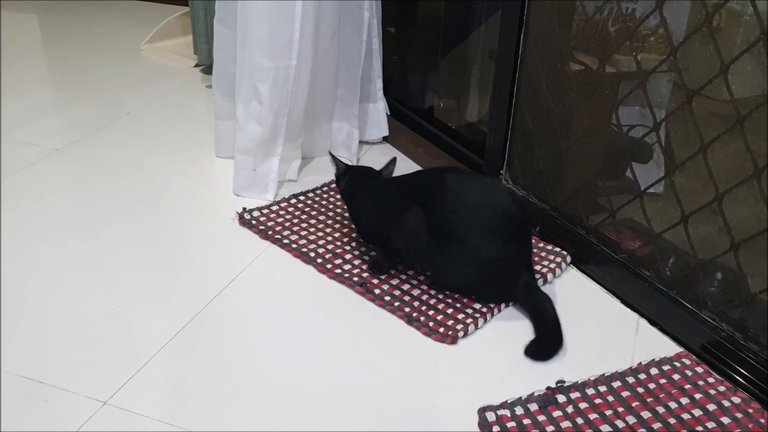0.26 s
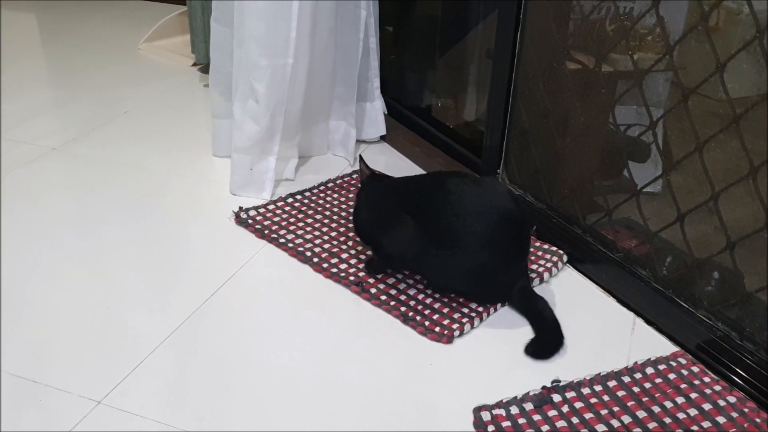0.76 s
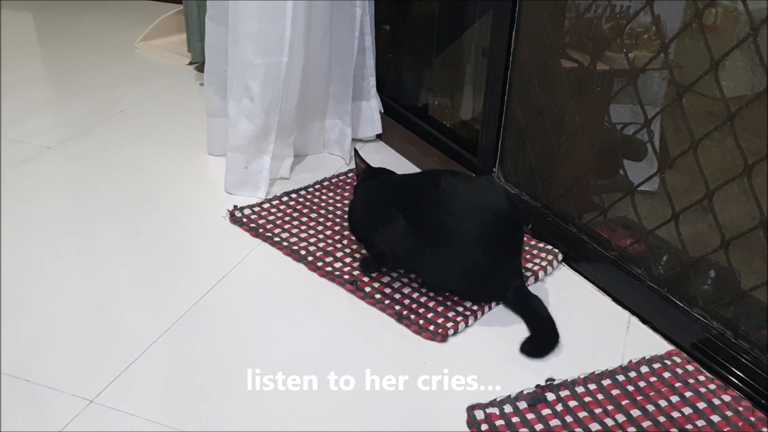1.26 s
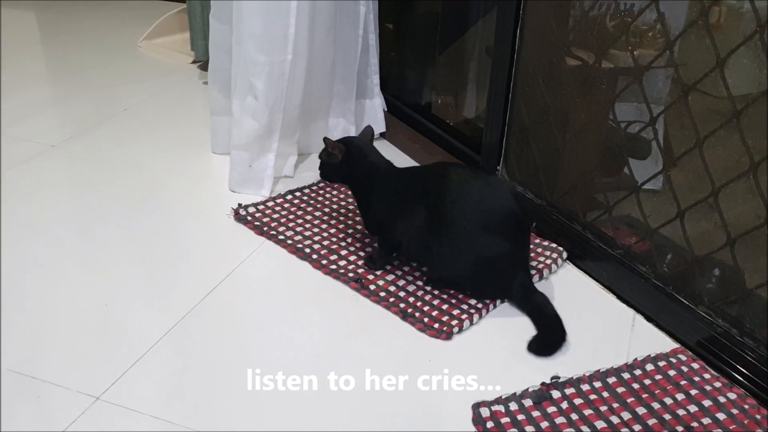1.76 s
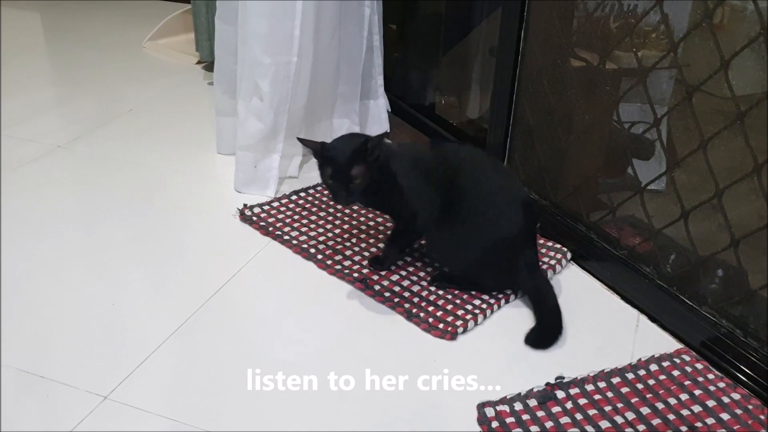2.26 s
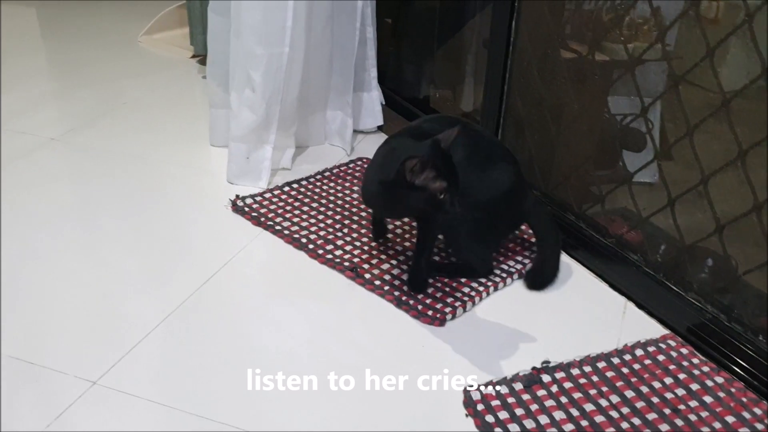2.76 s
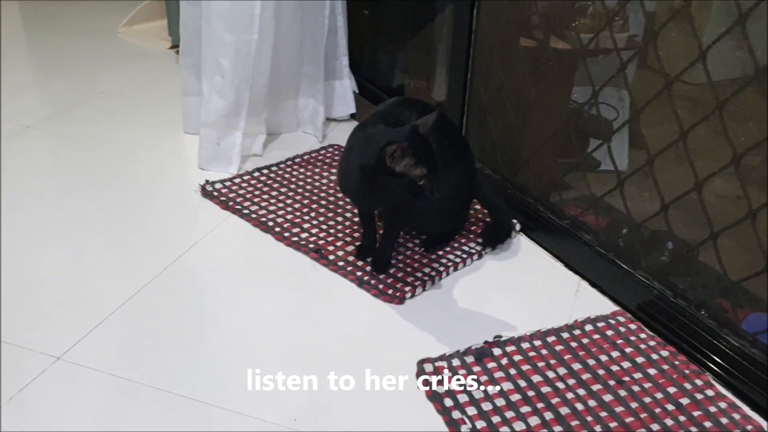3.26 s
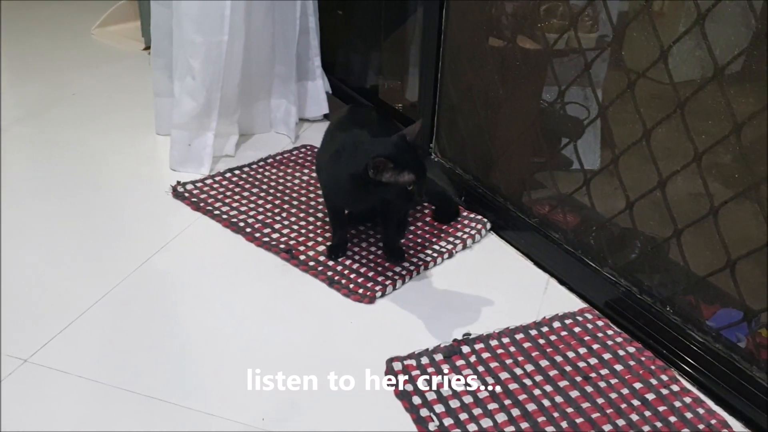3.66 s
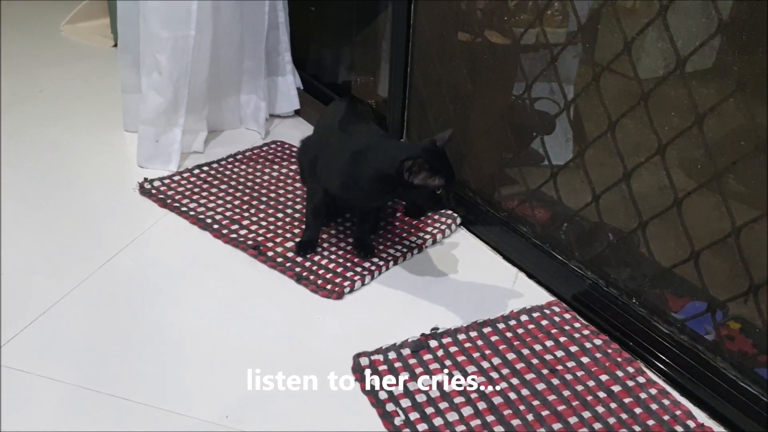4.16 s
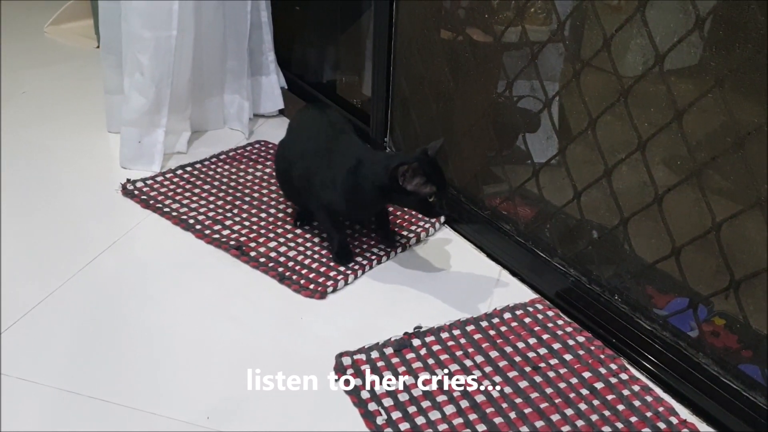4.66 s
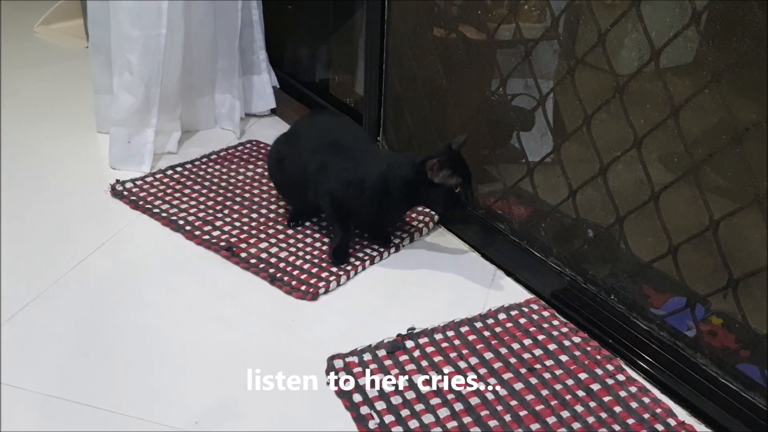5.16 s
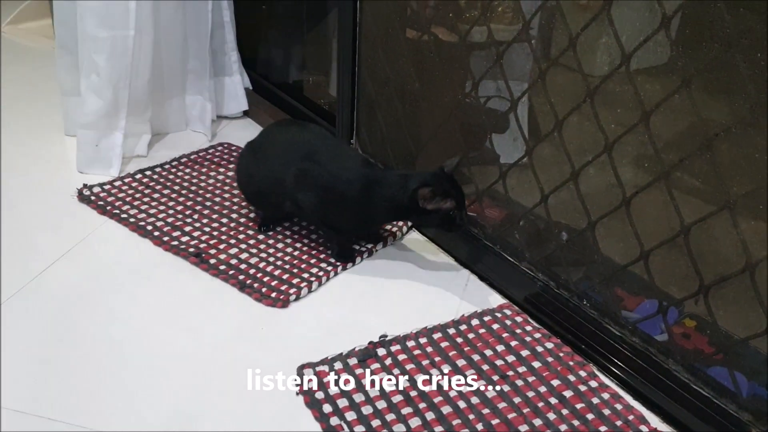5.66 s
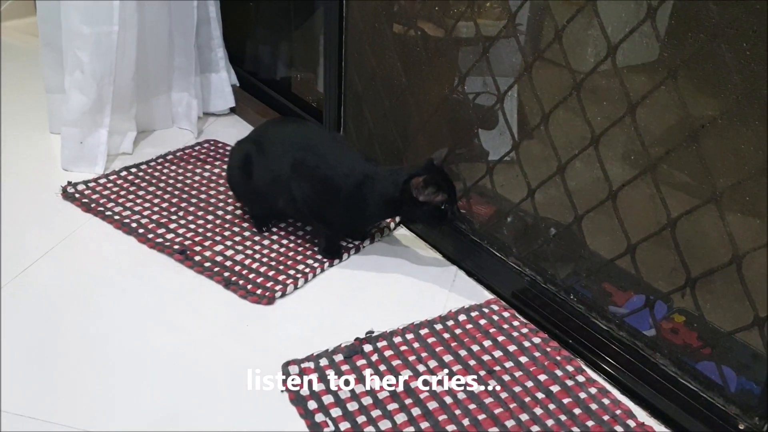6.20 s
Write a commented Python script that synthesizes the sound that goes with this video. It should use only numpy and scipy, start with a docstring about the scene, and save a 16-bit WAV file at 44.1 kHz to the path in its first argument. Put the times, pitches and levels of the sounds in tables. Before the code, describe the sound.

Indoors, a cat moans quietly twice, then cries out loudly twice, each call ringing briefly off hard tiles above faint room hum and hiss.

```python
"""In a tiled room with a glass door, a cat on a mat moans twice, muffled, then gives two loud, open cries.
It sniffs around the calls and something ticks once before the last one, which comes from the door.
The calls are harmonics of the vocal folds shaped by moving resonances and roughened by strain.
Sniffs and tick are coloured noise; decaying noise makes the room's ring.
A motor drones far off in steady room air, and the microphone hisses."""
import sys
import numpy as np
from scipy import signal
from scipy.fft import rfft, irfft, next_fast_len
from scipy.io import wavfile
from scipy.ndimage import map_coordinates

SR = 44100
rng = np.random.default_rng(int(sys.argv[2]) if len(sys.argv) > 2 else 0)


def file_out(sig):
    """Save sig as 16-bit WAV at sys.argv[1]."""
    # one column per channel
    cols = np.atleast_2d(sig).T
    # limit, then scale
    lim = np.clip(cols, -1, 1)
    pcm = np.round(lim * 32767).astype(np.int16)
    wavfile.write(sys.argv[1], SR, pcm)


N = 283563  # length [samples]


def amp(db):
    """Decibels to gain."""
    return 10 ** (np.asarray(db) / 20)


def unit(x):
    """Scale to rms 1."""
    return x / np.sqrt(np.mean(x ** 2) + 1e-20)


def along(points, hz):
    """(frequency [Hz], value) points read on a log frequency axis."""
    f, v = np.transpose(points)
    return np.interp(np.log(hz + 1), np.log(f + 1), v)


def curves(rows, t):
    """Each column after the time, read at the times t."""
    s, *columns = np.transpose(rows)
    return [np.interp(t, s, column) for column in columns]


def wobble(rate, size):
    """A smooth random curve with rate knots a second."""
    knots = rng.standard_normal(8192)
    return map_coordinates(knots, [np.arange(size) * rate / SR], mode="wrap")


def filtered(x, response):
    """x shaped by a response of frequency."""
    size = x.shape[-1]
    padded = next_fast_len(size + 8192)
    spectrum = rfft(x, padded) * response(np.fft.rfftfreq(padded, 1 / SR))
    return irfft(spectrum, padded)[..., :size]


def noise(colour, size):
    """Noise of rms 1 with a (frequency [Hz], level [dB]) colour."""
    return unit(filtered(rng.standard_normal(size), lambda hz: amp(along(colour, hz))))


def pan(left_db):
    """Gains of the two channels, left_db apart."""
    return amp(np.array([[left_db], [-left_db]]) / 2)


def resonance(hz, centre_hz, width_hz):
    """A peak of height 1, falling to half at width_hz from its centre."""
    return 1 / (1 + ((hz - centre_hz) / width_hz) ** 2)


# Spectrum of the room air: (frequency [Hz], relative density [dB per Hz])
AIR_COLOUR = [(20, -6), (40, -10.5), (75, 5), (130, 3.5), (165, -6), (350, -11), (550, -19.5), (800, -24),
              (1200, -28), (3000, -33.5), (6800, -35), (8000, -41.5), (11000, -33), (15500, -33)]
# How alike the air is at the two microphones: (frequency [Hz], likeness [0-1])
AIR_LIKENESS = [(50, 0.8), (300, 0.83), (900, 0.37), (2500, 0.6), (8000, 0.017)]
# Lean of the air to the left: (frequency [Hz], left minus right [dB])
AIR_LEAN = [(50, 2), (300, 8), (1000, 8), (2500, -2), (8000, 1)]


def background(level_db=-62):
    """Room air all round: shared noise makes the bass alike in both channels, the treble unrelated."""
    shared, opposed = noise(AIR_COLOUR, N), noise(AIR_COLOUR, N)

    def angle(hz):
        return np.arccos(np.clip(along(AIR_LIKENESS, hz), -1, 1)) / 2

    def lean(hz):
        return amp(np.outer([.5, -.5], along(AIR_LEAN, hz)))

    mid = filtered(shared, lambda hz: np.cos(angle(hz)))
    side = filtered(opposed, lambda hz: np.sin(angle(hz)))
    return amp(level_db) * filtered(np.array([mid + side, mid - side]), lean)


def microphone_hiss(level_db=-75.5, centre_hz=9530, half_width_hz=520):
    """A thin, steady band of electronic hiss, stronger on the right."""
    def band(hz):
        return 1 / (1 + np.abs((hz - centre_hz) / half_width_hz) ** 10)

    hiss = unit(filtered(rng.standard_normal((2, N)), band))
    return amp(level_db) * hiss * pan(left_db=-6.5)


# Tones of the far motor, before waver and pan: (frequency [Hz], rms level [dB])
MOTOR_TONES = [(56.5, -49.5), (59.2, -86), (112.6, -78.5), (121.5, -66)]
# Narrow band of rushing air, before pan: (centre [Hz], width [Hz], rms level [dB])
DUCT_AIR = [(816.4, 73, -81.5)]


def motor(drift=0.69, waver_db=1.95):
    """A distant motor: nearly steady, slightly wavering low tones, and a narrow band of moving air."""
    t = np.arange(N) / SR
    out = np.zeros(N)
    lowest_hz = MOTOR_TONES[0][0]
    for hz, db in MOTOR_TONES:
        level = amp(db + waver_db * wobble(12, N))
        phase = 2 * np.pi * hz * t + drift * hz / lowest_hz * wobble(3.9, N)
        out += np.sqrt(2) * level * np.sin(phase)
    for hz, width, db in DUCT_AIR:
        rush = filtered(rng.standard_normal(N), lambda f: resonance(f, hz, width / 2))
        out += amp(db) * unit(rush)
    return out * pan(left_db=4.5)


# How long the tiles ring: (frequency [Hz], time to fall 60 dB [s])
ROOM_DECAY = [(200, 0.22), (500, 0.41), (1000, 0.42), (2200, 0.44), (5000, 0.44), (12000, .25)]


def room(x, wet_db=-7, delay=0.016):
    """Tiles and glass answer each microphone with a different dying tail, faster or slower by pitch."""
    hz, t, grains = signal.stft(rng.standard_normal((2, SR)), SR, nperseg=256)
    decay = amp(-60 * t / along(ROOM_DECAY, hz)[:, None])
    tail = signal.istft(grains * decay, SR, nperseg=256)[1]
    # Silent for one delay [s], then fading in over another.
    tail *= np.clip(np.arange(tail.shape[1]) / SR / delay - 1, 0, 1)
    # Unit gain in the band of the voice, 400-3000 Hz.
    strength = np.sqrt(np.mean(np.abs(rfft(tail, SR)[:, 400:3000]) ** 2))
    return amp(wet_db) * signal.fftconvolve(x[None], tail / strength, axes=1)[:, :N]


# Where the head points, between the two microphones:
# (frequency [Hz], left minus right [dB], phase by which the left leads [rad])
FROM_MAT = [(493, 4, -5.5), (1050, 3.5, 3.16), (2130, 6, 1.15), (5960, 4.5, 1.87), (11000, -13, 1)]
FROM_TURN = [(550, 3.5, 1), (1110, 2.5, .5), (1720, 0.5, 1.76), (2240, 6, 2), (4500, 6.5, 1.5),
             (11000, -10, 1.1)]
FROM_DOOR = [(500, 7.5, 0.46), (1000, 4.5, 0.6), (1930, 3, 2.2), (4300, 6, -2.6), (11000, 1, 1.7)]


def heard_from(x, place):
    """Direct sound: each microphone takes half of the difference in level and phase."""
    hz, lean_db, lead = np.transpose(place)
    sides = np.array([[.5], [-.5]])

    def response(f):
        level = amp(sides * along(np.c_[hz, lean_db], f))
        return level * np.exp(1j * sides * along(np.c_[hz, lead], f))

    return filtered(x, response)


# A claw-like tick: (time [s], level before the gain [dB])
TICK_TIMES = [(4.5518, -48.5)]
# Its spectrum: (frequency [Hz], relative level [dB])
TICK_SPECTRUM = [(1500, 6.5), (3200, -4), (4500, -3.5), (7000, 4), (9500, 3), (11500, -13), (15000, -21.5)]


def tick(gain_db=-10, t60=0.082):
    """A small dry tick, like a claw on the door track: noise that starts at once and dies away."""
    t = np.arange(N) / SR
    decay = sum((t >= s) * amp(db + gain_db - 60 * np.abs(t - s) / t60) for s, db in TICK_TIMES)
    return decay * noise(TICK_SPECTRUM, N)


# Quick sniffs of the cat: (time of the middle [s], level there [dB], half length [s])
SNIFF_TIMES = [(0.378, -66.5, 0.029), (1.391, -72, 0.04), (3.351, -72, 0.037), (6.363, -68, 0.035)]
# Their spectrum: (frequency [Hz], relative level [dB])
SNIFF_SPECTRUM = [(500, -20), (1000, -3), (1500, -0.5), (2200, -12), (3500, -21.5), (6000, -21),
                  (9000, -28), (15000, -24)]


def sniffs():
    """Short swells of air noise through the cat's nose."""
    t = np.arange(N) / SR
    swell = sum(amp(db) * np.exp(-.5 * ((t - s) / half) ** 2) for s, db, half in SNIFF_TIMES)
    return swell * noise(SNIFF_SPECTRUM, N)


# Strain of each yowl: (hoarse onset [s], roughness then [0-1], roughness when clear [0-1],
# cracked end [s], roughness then [0-1])
CALL_STRAIN = [(.31, .62, .2, .04, .45), (.1, .4, .2, .05, .65), (.25, .26, .13, .03, .55),
               (.19, .62, .095, .07, .65)]


def strain(t, start, end, call, clear_s=.02, crack_s=.015):
    """Roughness 0-1 through a call: hoarse onset, clear middle, cracked end."""
    hoarse_for, hoarse, clear, cracked_for, cracked = CALL_STRAIN[call]
    onset = .5 - .5 * np.tanh((t - start - hoarse_for) / clear_s / 2)
    ending = .5 + .5 * np.tanh((t - end + cracked_for) / crack_s / 2)
    return np.clip(clear + (hoarse - clear) * onset + (cracked - clear) * ending, 0, 1)


def vocal_phase(t, pitch, rough, tremor=.028, jitter=.028):
    """Phase of the vocal folds: strain makes them quaver and slip from cycle to cycle."""
    unsteady = tremor * wobble(55, len(t)) + jitter * wobble(420, len(t))
    return 2 * np.pi * np.cumsum(pitch * (1 + rough * unsteady)) / SR


def overtones(phase, orders, weights):
    """Weighted harmonics of the phase, together of rms 1."""
    return np.sqrt(2) * np.sum(weights * np.sin(orders * phase), 0) / np.linalg.norm(weights, axis=0)


# Pushes of effort that brighten the voice, before the gain of the call:
# (time [s], treble peak [dB], rise [dB/s], fall [dB/s])
EFFORT_PUSHES = [(.74, -73, 250, 90), (1.0, -72, 193, 84), (2.33, -69.5, 600, 43), (2.41, -69, 213, 87),
                 (3.7, -72, 151, 8), (3.95, -53.5, 222.5, 34.5), (4.08, -53.5, 144, 80),
                 (4.351, -61.5, 302, 197), (5.59, -55.5, 167.5, 37.5), (5.82, -45.5, 64.5, 92)]


def treble_db(t):
    """Level of the high harmonics: it climbs to each push within the call and sinks after it."""
    slopes = [db - np.maximum(rise * (s - t), fall * (t - s))
              for s, db, rise, fall in EFFORT_PUSHES if t[0] < s < t[-1]]
    return np.max(slopes, 0)


# Swing of the tongue's sharp upper resonance in each yowl:
# (time of the turn [s], half length [s], resting centre [Hz], centre at the turn [Hz], boost then [dB])
TONGUE_SWINGS = [(.9, .2, 6600, 6640, 10), (2.45, .2, 5700, 5600, 12), (3.821, 0.21, 6270, 6775, 9.5),
                 (5.66, 0.18, 5234, 4040, 31.5)]


def tongue(t, call, rest_db=5):
    """Centre and boost of the upper resonance: one smooth swing out and back."""
    turn_s, half_s, rest_hz, turn_hz, boost_db = TONGUE_SWINGS[call]
    swing = np.exp(-.5 * ((t - turn_s) / half_s) ** 2)
    return rest_hz + (turn_hz - rest_hz) * swing, rest_db + (boost_db - rest_db) * swing


# What full roughness does to each yowl: (growl relative to the fundamental [dB],
# flutter depth [ratio], rasp depth [ratio], shimmer depth [ratio])
CALL_GRAIN = [(-20, .33, .25, .6), (-22, .26, .27, .55), (-9, .25, .09, .7), (-4, .32, .13, .6)]
# Share of air in the treble of each yowl at its clearest, at air_hz: [0-1]
CALL_BREATH = [1, .5, .11, .035]


def yowl(call, vowel, melody, edge_colour, gain_db, width_hz, flutter_hz=125, beam_db=4.5, fade=0.037,
         air_hz=3800, air_per_rough=1.1):
    """One call: the harmonics of the folds pass two moving resonances and roughen with strain."""
    start, end = vowel[0][0], vowel[-1][0]
    span = np.arange(int((start - .05) * SR), int((end + .05) * SR))
    t, size = span / SR, len(span)
    pitch, = curves(melody, t)
    root_db, octave_db, mouth_db, mouth_hz = curves(vowel, t)
    rough = strain(t, start, end, call)
    growl_db, flutter, rasp, shimmer = CALL_GRAIN[call]
    ring_hz, ring_db = tongue(t, call)
    phase = vocal_phase(t, pitch, rough)
    voice = np.sqrt(2) * (amp(root_db) * np.sin(phase) + amp(octave_db) * np.cos(2 * phase))

    # The mouth resonance moves between the third and fourth harmonics as the jaw opens and closes.
    middle = np.arange(3, 5)[:, None]
    mouth_weights = resonance(middle * pitch, mouth_hz, width_hz) ** 4
    voice += amp(mouth_db) * overtones(phase, middle, mouth_weights)

    # Uneven cycles spread noise round each harmonic; a second, slower vibration adds sidebands.
    sidebands = flutter * rough * np.sin(2 * np.pi * flutter_hz * t + 2 * wobble(30, size))
    voice *= 1 + sidebands + rasp * np.sqrt(rough) * wobble(520, size)

    # Strained folds also growl loosely at half the pitch.
    voice += amp(root_db + growl_db) * rough * np.sin(phase / 2 + 2 * wobble(90, size))

    # The high harmonics pass the upper resonance.
    high = np.arange(5, 28)[:, None]
    high_hz = high * pitch
    boost = 1 + (amp(ring_db) - 1) * resonance(high_hz, ring_hz, width_hz=330) ** 2
    # Short waves beam from the mouth, so each one swells and fades as the head turns.
    beaming = amp(beam_db * np.array([wobble(8.8, size) for _ in high]))
    weights = beaming * boost * amp(along(edge_colour, high_hz))

    # Turbulent air smears them into a hiss, more so the higher and the hoarser they are.
    breath = CALL_BREATH[call] + air_per_rough * (rough - rough.min())
    air = np.clip(breath * high_hz / air_hz, 0, 1)
    scatter = np.array([2.13 * wobble(330, size) for _ in high])
    waves = np.sqrt(1 - air) * np.sin(high * phase) + np.sqrt(air) * np.sin(high * phase + scatter)
    edge = np.sqrt(2) * np.sum(weights * waves, 0) / np.linalg.norm(weights, axis=0)
    voice += amp(treble_db(t)) * edge

    gate = np.clip(1 + np.minimum(t - start, end - t) / fade, 0, 1) ** 2
    shimmering = 1 + shimmer * rough * wobble(74.54, size)
    out = np.zeros(N)
    out[span] = amp(gain_db) * gate * voice * shimmering
    return out


# For each call below, with levels before its gain:
# vowel (time [s], fundamental [dB], octave [dB], mouth resonance [dB], mouth resonance [Hz]),
# melody (time [s], pitch [Hz]) and treble colour (frequency [Hz], relative level [dB])
MOAN_VOWEL = [(0.63, -71.5, -84, -86, 1360), (0.732, -55.5, -61.5, -64, 1540),
              (0.81, -59, -61.5, -70, 1360), (0.968, -55, -54, -68, 1450),
              (1.074, -49.5, -52.5, -61.5, 1510), (1.138, -46, -53, -66.5, 1457),
              (1.15, -90, -70, -80, 1470)]
MOAN_MELODY = [(0.66, 487.0), (0.766, 492.4), (0.772, 519), (0.808, 487.5), (1.094, 519.3), (1.135, 472)]
MOAN_TREBLE = [(2500, -7.5), (3500, -7.5), (5000, -9), (6500, -4.5), (8000, -12), (11000, -8), (15000, -16)]


def moan():
    """First call: a muffled, breathy moan with a narrow mouth resonance."""
    return yowl(0, MOAN_VOWEL, MOAN_MELODY, MOAN_TREBLE, gain_db=0.33, width_hz=490)


# Vowel, melody and treble of the second call, columns as for the moan
MEW_VOWEL = [(2.02, -70, -93, -91, 1550), (2.056, -65, -81, -101, 1300), (2.078, -63, -77, -74, 1250),
             (2.234, -52, -75, -77, 1440), (2.294, -57.5, -59, -75, 1630), (2.334, -61.5, -45, -55, 1780),
             (2.456, -67, -55, -56.5, 2040), (2.64, -63.5, -63, -76, 1990)]  # (time [s], fundamental, octave, mouth [dB], mouth [Hz])
MEW_MELODY = [(2.03, 408.7), (2.088, 440), (2.102, 448.6), (2.196, 500), (2.466, 548), (2.63, 562.5)]  # (time [s], pitch [Hz])
MEW_TREBLE = [(2700, 0.5), (3300, -8), (4300, -12), (5000, -12), (5500, 9), (6100, 3), (6800, -24),
              (11000, -30), (15000, -37.5)]  # (frequency [Hz], level [dB])


def mew():
    """Second call: a muffled moan whose pitch climbs all the way."""
    return yowl(1, MEW_VOWEL, MEW_MELODY, MEW_TREBLE, gain_db=2.4, width_hz=580)


# Vowel, melody and treble of the third call, columns as for the moan
CRY_VOWEL = [(3.52, -73.5, -79, -76, 1410), (3.576, -65.5, -64.5, -82.5, 1570),
             (3.638, -63.5, -49.5, -47, 1740), (3.752, -64, -44, -44.5, 1790),
             (3.866, -53.5, -45, -43.5, 2230), (3.944, -56.5, -29, -34.5, 2240),
             (4.048, -55.5, -39, -32, 2250), (4.096, -49.5, -26.5, -43.5, 2170),
             (4.164, -62, -68, -40, 2270), (4.306, -58, -48.5, -44, 2210), (4.36, -50, -46.5, -55.5, 2200)]  # (time [s], fundamental, octave, mouth [dB], mouth [Hz])
CRY_MELODY = [(3.53, 485), (3.56, 532), (3.582, 531.3), (3.718, 528.4), (3.96, 569), (4.03, 565.2),
              (4.084, 557.9), (4.132, 571.3), (4.312, 562.6), (4.36, 519)]  # (time [s], pitch [Hz])
CRY_TREBLE = [(2600, 15), (2800, 13.5), (2900, 19), (3400, -7), (4000, -1.5), (4500, -7), (5100, 5),
              (6300, 7.5), (6900, -5.5), (7400, -32.5), (8600, -5.5), (10000, -17.5), (10900, -3),
              (12000, -27.5), (14000, -19), (15500, -27)]  # (frequency [Hz], level [dB])


def cry():
    """Third call: loud and open-mouthed, with a wide mouth resonance."""
    return yowl(2, CRY_VOWEL, CRY_MELODY, CRY_TREBLE, gain_db=0.9, width_hz=1130)


# Vowel, melody and treble of the fourth call, columns as for the moan
WAIL_VOWEL = [(5.255, -59.5, -57, -63.5, 1877), (5.295, -49.5, -42.5, -43.5, 1900),
              (5.337, -54.5, -40.5, -54, 1536), (5.495, -39, -32, -40, 1480),
              (5.601, -33, -28.5, -49, 1526), (5.699, -36, -25, -43, 1588), (5.865, -38, -25, -45.5, 1875),
              (5.957, -53, -42.5, -37, 1970), (6.0, -52.5, -46, -56, 1862)]  # (time [s], fundamental, octave, mouth [dB], mouth [Hz])
WAIL_MELODY = [(5.255, 531.6), (5.291, 471.7), (5.303, 488.0), (5.329, 465.3), (5.481, 501.1),
               (5.893, 499.3), (5.981, 531.1), (6.0, 564.8)]  # (time [s], pitch [Hz])
WAIL_TREBLE = [(2400, -13), (2900, -16), (3400, -19), (4000, -4), (4550, 2), (5050, -5), (6000, -2),
               (6500, -12), (7100, -7), (8000, -21), (10000, -11), (11500, -23), (13700, -18), (15500, -28)]  # (frequency [Hz], level [dB])


def wail():
    """Fourth call: a loud open cry, strong in the fundamental and octave."""
    return yowl(3, WAIL_VOWEL, WAIL_MELODY, WAIL_TREBLE, gain_db=-0.8, width_hz=830)


def scene():
    """The cat calls twice from the mat, once as it turns and once at the door, in the ringing room."""
    on_mat = moan() + mew() + sniffs() + tick()
    turning = cry()
    at_door = wail()
    direct = heard_from(on_mat, FROM_MAT) + heard_from(turning, FROM_TURN) + heard_from(at_door, FROM_DOOR)
    ringing = room(on_mat + turning + at_door) * pan(left_db=5.5)
    return direct + ringing + motor() + background() + microphone_hiss()


def record(dry, top_hz=15750):
    """The recorder keeps nothing above its band limit."""
    return filtered(dry, lambda hz: hz < top_hz)


dry = scene()
out = record(dry)
file_out(out)
```